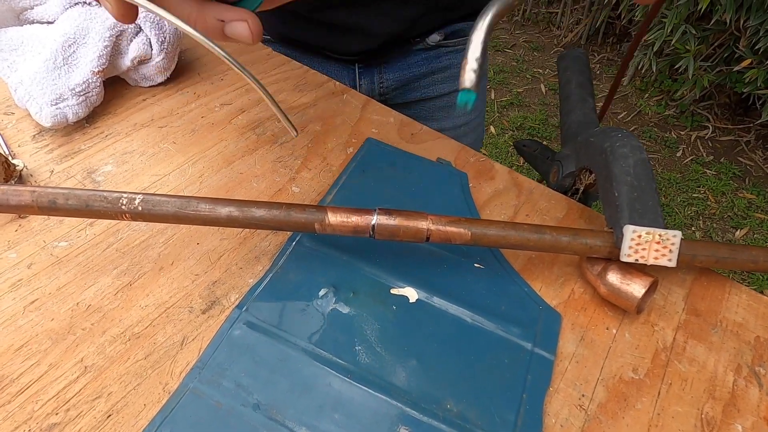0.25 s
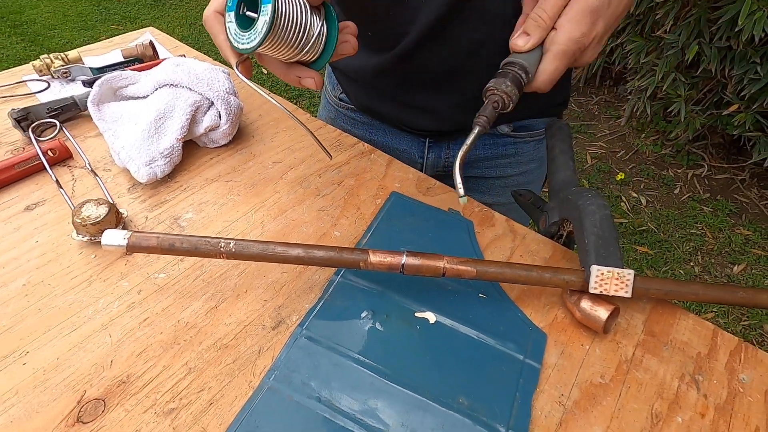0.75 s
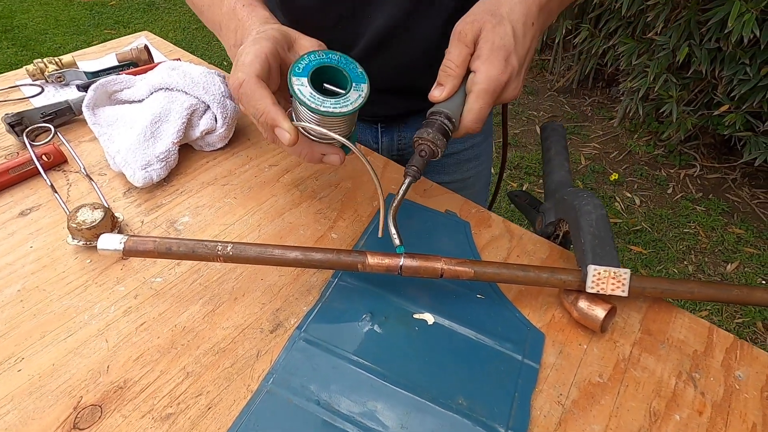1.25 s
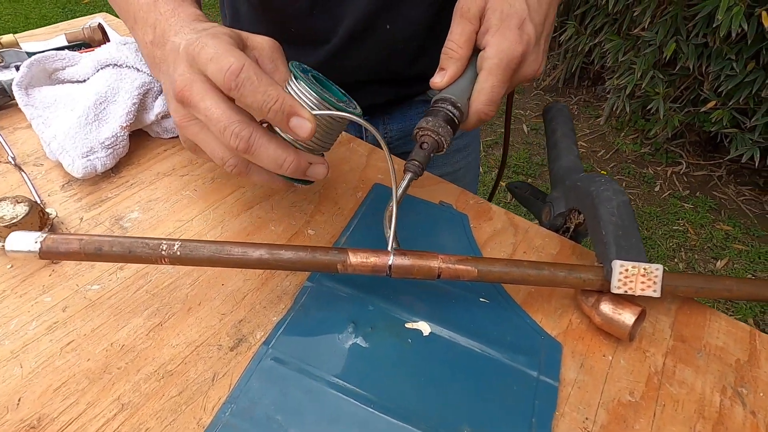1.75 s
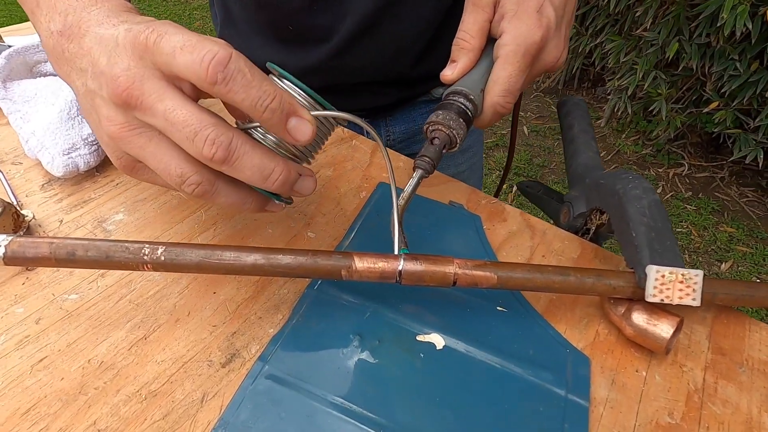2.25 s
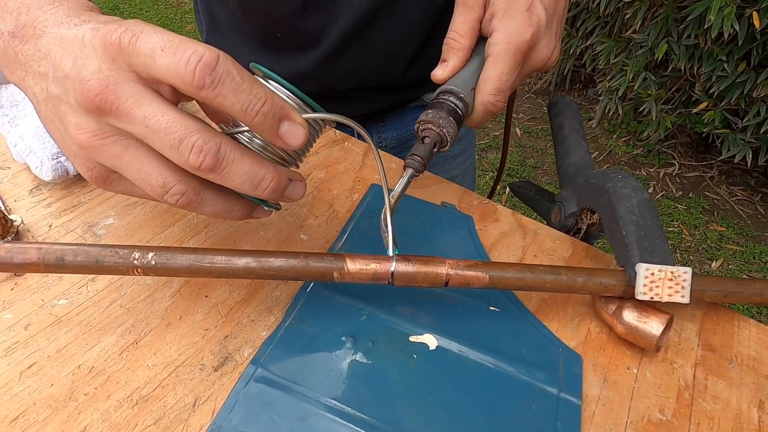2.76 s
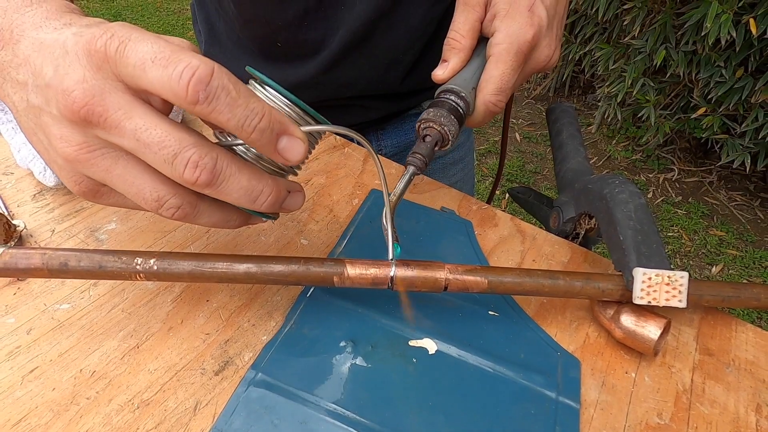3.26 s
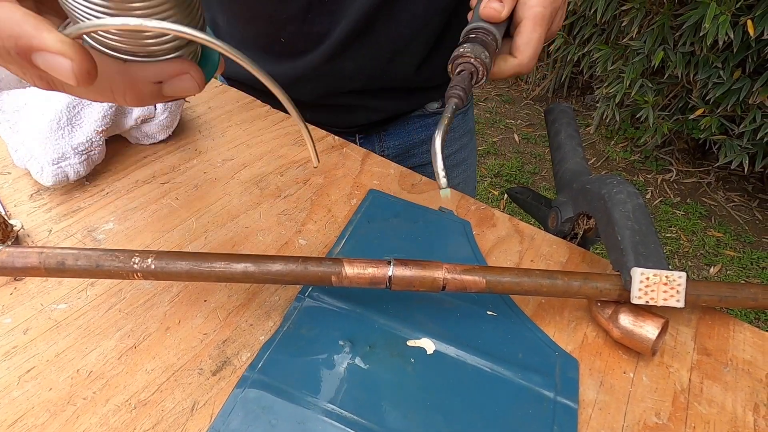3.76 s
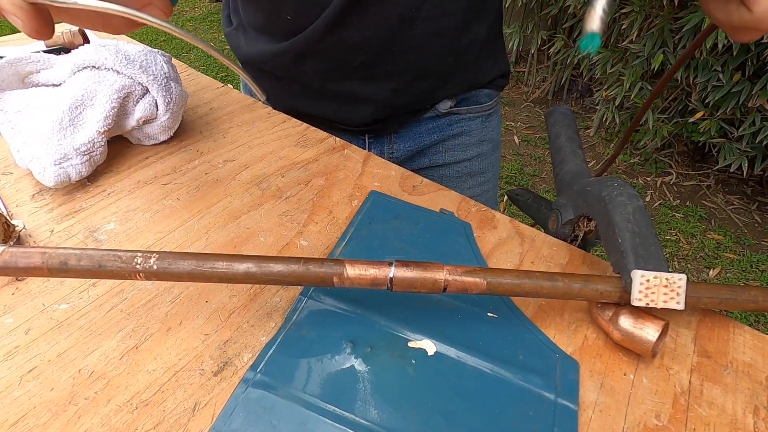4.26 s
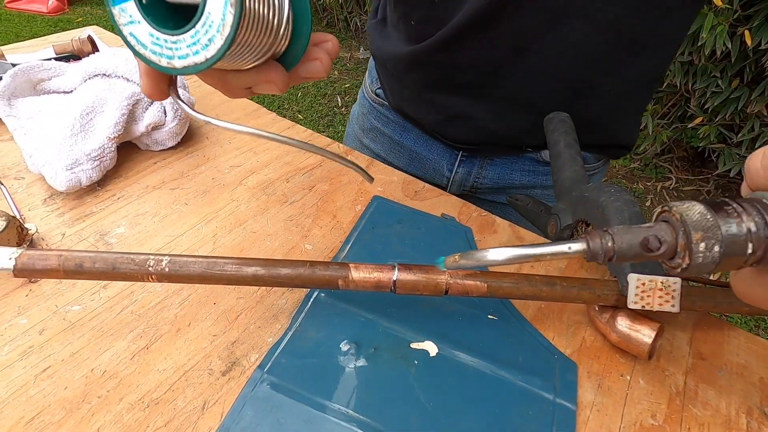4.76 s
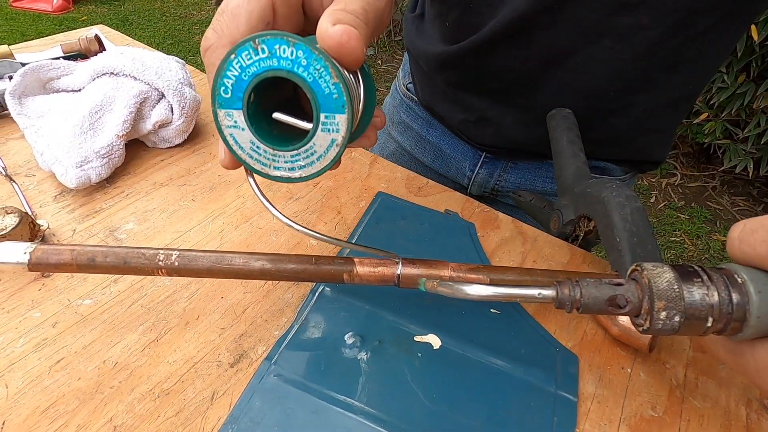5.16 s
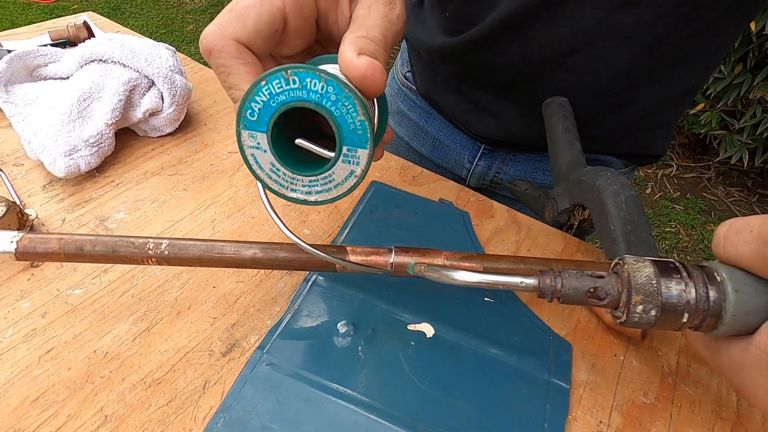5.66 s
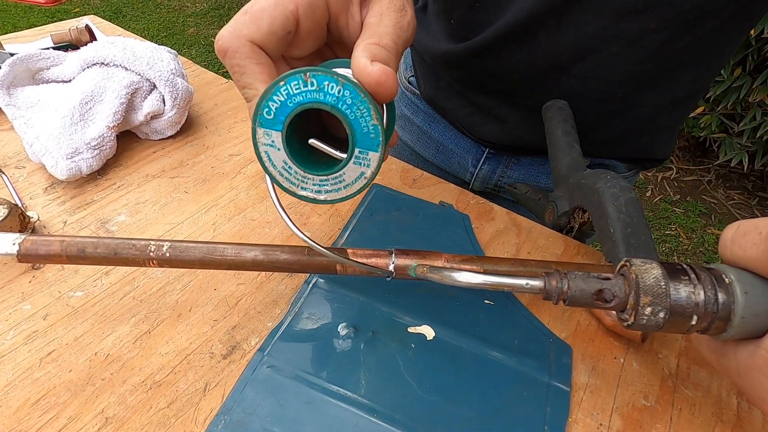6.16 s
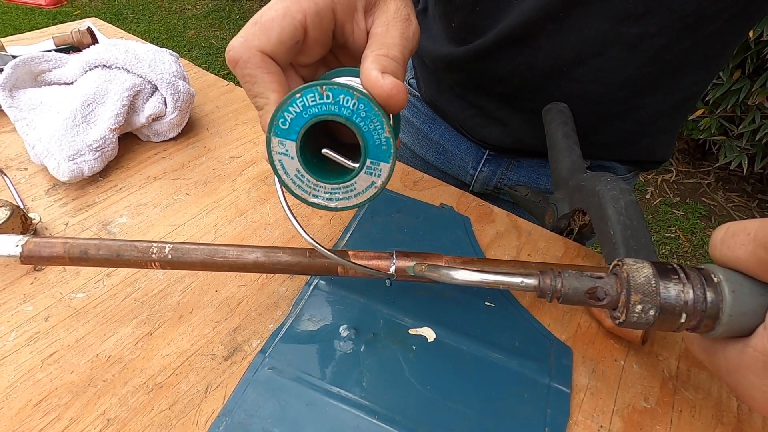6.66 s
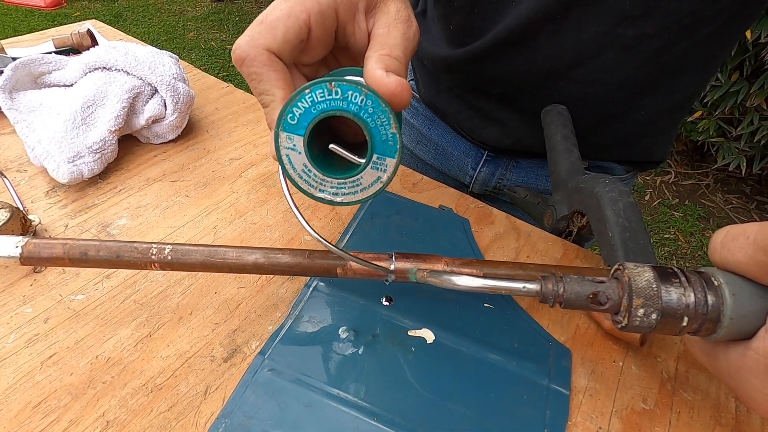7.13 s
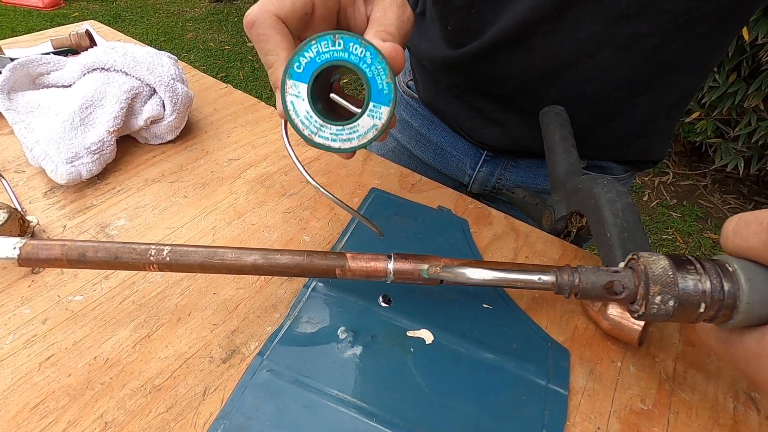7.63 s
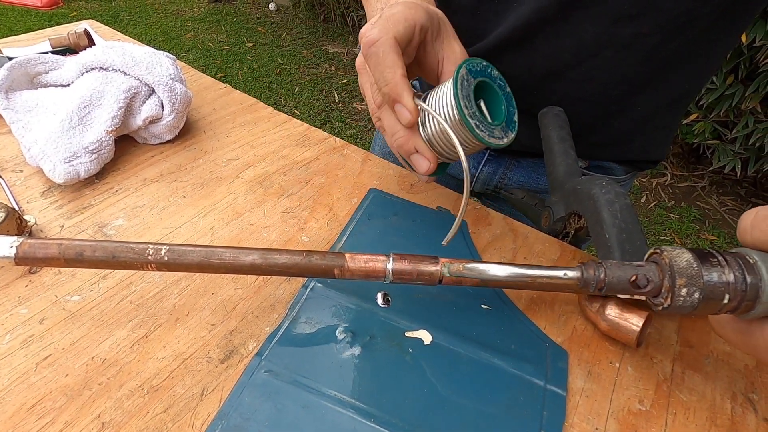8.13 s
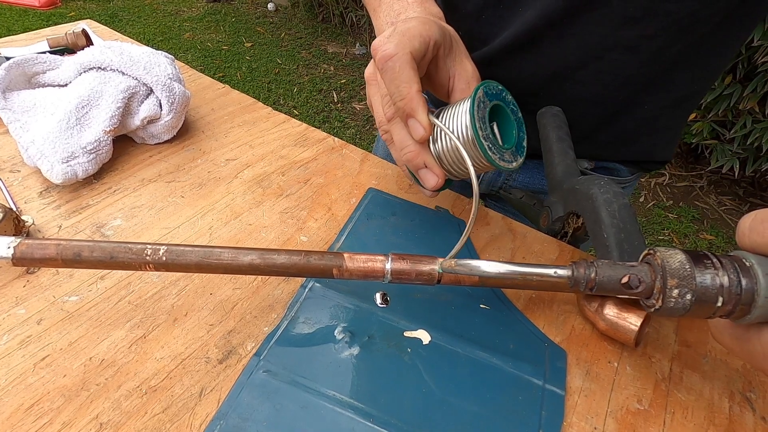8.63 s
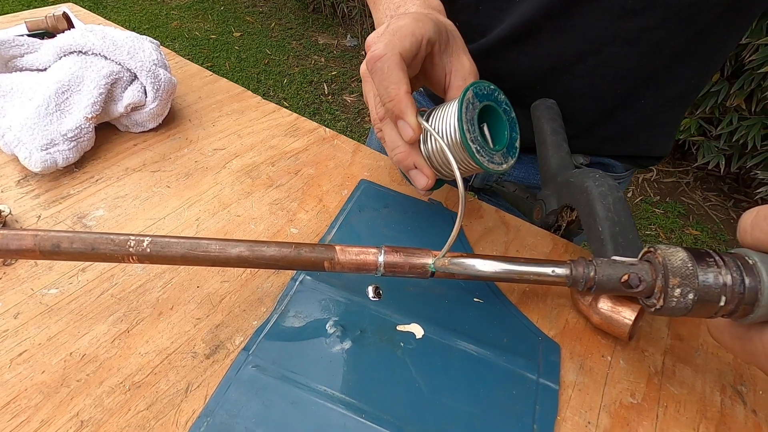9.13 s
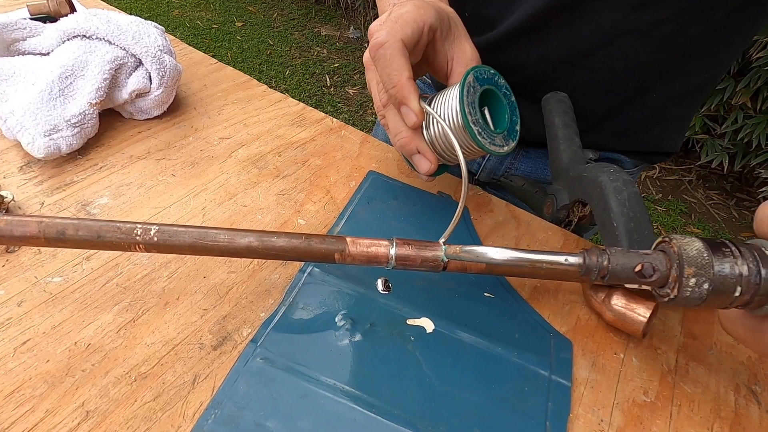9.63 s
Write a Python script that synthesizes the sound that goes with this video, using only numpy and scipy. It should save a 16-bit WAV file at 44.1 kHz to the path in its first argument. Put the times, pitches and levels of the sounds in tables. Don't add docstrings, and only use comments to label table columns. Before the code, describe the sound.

Continuous rushing hiss of a torch flame with a faint nozzle whistle, hollow sweeping shifts, soft wind-like flutters and a fuller roar against pipe.

```python
import sys
import numpy as np
from scipy import signal
from scipy.fft import rfft, irfft, next_fast_len
from scipy.io import wavfile
from scipy.ndimage import uniform_filter1d

SR = 44100
rng = np.random.default_rng(int(sys.argv[2]) if len(sys.argv) > 2 else 0)


def volts_from_db(level):
    exponent = np.asarray(level, float) / 20
    return 10 ** exponent


def to_wav(s):
    ch = np.atleast_2d(s).T
    pcm = np.round(np.clip(ch, -1, 1) * 32767)
    wavfile.write(sys.argv[1], SR, pcm.astype(np.int16))


N = 436149
SIZE = next_fast_len(N + 8192)
HZ = np.maximum(np.arange(SIZE // 2 + 1) * SR / SIZE, 1)
FLICKER_DB = 1.0


def in_time(rows):
    s, *columns = np.transpose(rows)
    return [np.interp(np.arange(N) / SR, s, column) for column in columns]


def spells(rows):
    edge_s = 0.021
    t = np.arange(0, N, 32) / SR
    total = 0
    for middle, length, db in rows:
        rise = np.tanh((t - middle + length / 2) / edge_s)
        fall = np.tanh((t - middle - length / 2) / edge_s)
        total = total + db * (rise - fall) / 2
    return np.interp(np.arange(N) / SR, t, total)


def at_hz(points):
    hz, value = np.transpose(points)
    return np.interp(np.log(HZ), np.log(hz), value)


def filtered(x, gain):
    return irfft(rfft(x, SIZE) * gain, SIZE)[..., :N]


def noise(spectrum, count=1):
    x = filtered(rng.standard_normal((count, N)), volts_from_db(at_hz(spectrum)))
    return x / x.std()


def drift(rate):
    x = filtered(rng.standard_normal(N), 1 / (1 + (HZ / rate) ** 2))
    return x / x.std()


def hiss():
    # (frequency [Hz], density [dB per Hz])
    jet_spectrum = [(200, -24.5), (500, -10), (900, -6.5), (1300, -1.5), (2000, 2), (2600, -1),
                    (3200, -1.5), (3700, -1), (4400, -7), (5200, -7), (6300, -2), (8000, -15),
                    (11000, -33.5), (15000, -48.5)]
    # (time [s], hiss [dB], brightness [dB])
    aim = [(0.0, -41, -14), (.3, -41, -16.5), (0.46, -39, -18), (0.56, -41.5, -29.5), (.75, -43, -17.5),
           (0.9, -42.5, -19), (1.05, -40.5, -19.5), (1.6, -43.5, -11), (2.2, -41.5, -17.5), (2.6, -39, -23),
           (3.0, -39.5, -19), (3.42, -40.5, -18.5), (3.6, -41, -19), (3.8, -39.5, -21.5), (4.0, -40.5, -16),
           (4.3, -40, -19.5), (4.65, -41, -18.5), (5.0, -40, -15.5), (5.4, -41.5, -14.5), (5.75, -44, -9.5),
           (6.5, -41, -18.5), (7.0, -39, -18), (7.4, -42, -14), (7.8, -42, -12.5), (8.3, -43, -11),
           (8.9, -43.5, -10), (9.4, -42, -13), (9.89, -43.5, -11)]
    # (middle [s], length [s], level [dB])
    shades = [(.58, 0.16, -0.5), (1.05, 0.29, -1), (1.64, 0.41, -3.5), (1.98, 0.28, -1.5), (2.56, 0.16, -3),
              (3.5, 0.13, 1), (4.3, 0.28, -3.5), (4.59, 0.075, -4.5), (5.0, 0.083, -1.5),
              (5.55, 0.21, -1.5), (6.65, 0.24, -7), (7.08, 0.12, -3.5), (8.42, 0.13, -3)]
    hiss_db, bright_db = in_time(aim)
    jet = noise(jet_spectrum, count=3)
    bright_hz = 4680
    top = filtered(jet, 1 / (1 + (bright_hz / HZ) ** 4))
    top_gain = volts_from_db(bright_db + spells(shades) + 24.0 + FLICKER_DB * drift(8.0))
    return volts_from_db(hiss_db + 2.5) * (jet - top + top_gain * top)


def roar(wrap_db):
    # (frequency [Hz], density [dB per Hz])
    roar_spectrum = [(150, -21.5), (350, -6), (520, -2), (720, 4), (1000, -5.5), (1500, -12), (2600, -11),
                     (3200, -44)]
    free_flame_db = -54
    return volts_from_db(free_flame_db + wrap_db + FLICKER_DB * drift(24)) * noise(roar_spectrum, count=3)


def rumble():
    # (frequency [Hz], density [dB per Hz])
    low_spectrum = [(15, -35), (30, -36), (55, -0.5), (110, -3.5), (200, 0.5), (320, -4), (600, -35.5)]
    # (middle [s], length [s], level over the calm [dB])
    puffs = [(1.0, 1.8, -1), (.26, 0.2, 8.5), (.53, 0.19, 6), (.75, 0.27, 4), (.98, 0.17, 9.5),
             (1.2, 0.12, 7), (1.95, 0.3, -17), (3.61, 0.12, 6), (3.89, 0.08, 18), (4.05, 0.034, 14),
             (4.45, 0.29, 7.5), (4.68, 0.19, 8), (5.15, 0.44, 7), (5.65, 0.44, 2.5), (6.6, 0.24, 3),
             (7.38, 0.26, 6), (8.4, 0.21, 6)]
    # (middle [s], length [s], level over the calm [dB])
    gusts = [(.27, 0.11, 17.5), (.52, 0.082, 10), (.62, 0.56, 6.5), (.91, 0.061, 6), (1.17, .3, 8),
             (1.64, 0.091, 12), (1.92, 0.24, 12.5), (2.5, 0.051, 4), (2.82, 0.11, 4), (3.6, 0.11, 5),
             (3.89, 0.074, 0), (4.5, 0.21, 11), (4.68, 0.083, 11), (5.28, 0.38, 7.5), (5.7, 0.12, 7),
             (5.87, 0.055, 11), (6.48, .25, 5), (6.92, 0.086, 6), (7.35, 0.18, 5), (7.62, 0.11, 7),
             (7.95, 0.19, 8), (8.3, 0.34, 2), (8.8, .3, 2)]
    calm_db, gust_cut_hz = -66, 133
    x = noise(low_spectrum, count=3)
    deep = filtered(x, 1 / (1 + (HZ / gust_cut_hz) ** 4))
    flutter = volts_from_db(calm_db + spells(puffs) + 2.1 * drift(5.4)) * (x - deep)
    return flutter + volts_from_db(calm_db + spells(gusts)) * deep


def whistle(wrap_db, hz, width_hz, level_db):
    waver_db, choke = 2, 0.71
    x = filtered(rng.standard_normal(N), 1 / (1 + (2 * (HZ - hz) / width_hz) ** 2))
    return volts_from_db(level_db + waver_db * drift(3.7) - choke * wrap_db) * x / x.std()


def whistles(wrap_db):
    # (middle [s], length [s], level [dB])
    turned = [(.75, 0.43, -7), (6.7, 0.8, -13), (1.2, 0.4, -5), (1.6, 0.29, -0.5), (3.7, 0.23, -4),
              (4.0, 0.31, -6), (4.7, 0.79, -6), (8.45, 0.31, 2.5), (9.2, 1.4, 3.5)]
    # (frequency [Hz], width [Hz], level [dB])
    side_whistles = [
        (3930, 127, -62.5),
        (6120, 130, -62),
        (8700, 160, -76),
    ]
    # (middle [s], length [s], level [dB])
    facing = [
        [(.3, .2, 13), (1.3, 1.2, 12), (2.3, 0.23, 1), (3.2, 0.45, 2), (5.8, 0.59, -1), (8.4, 3.7, 11.5)],
        [(.3, .2, 10), (.7, .3, 18), (1.3, 0.65, 11), (2.9, 1.0, 8), (4.28, .25, 13), (5.35, 0.32, 14),
         (6.9, .2, 8)],
        [(.2, .5, 14), (1.75, 1.11, 16.5), (2.5, .2, 14), (3.1, .7, 12.5), (4.1, .2, 12), (4.9, .2, 6),
         (6.9, .9, 6), (8.1, .2, -1)],
    ]
    total = whistle(wrap_db, 5380, 160, -47 + spells(turned))
    for (hz, width_hz, db), rows in zip(side_whistles, facing):
        total = total + whistle(wrap_db, hz, width_hz, db + spells(rows))
    return total


def late(x, delay_ms):
    n = np.arange(N)
    port_skew = 0.015
    left = np.interp(n - delay_ms * (1 + port_skew) * SR / 1000, n, x[0])
    right = np.interp(n - delay_ms * (1 - port_skew) * SR / 1000, n, x[1])
    return np.array([left, right])


def with_echoes(x, source, tables, scale=1):
    paths = [(ms, np.clip(scale * share, 0, 1)) for ms, share in map(in_time, tables)]
    copies = sum(share * late(source, ms) for ms, share in paths)
    power = 1 + sum(share ** 2 for ms, share in paths)
    return (x + copies) / np.sqrt(power)


def worker_echoes(x):
    # (time [s], delay [ms], share [0-1])
    hand = [(0.0, .63, .1), (.9, .63, .15), (1.1, .64, .05), (1.25, .645, .34), (2.1, .63, .26),
            (2.25, .58, .08), (2.4, .525, .22), (3.45, .525, .2), (3.7, .63, .15), (4.9, .635, .14),
            (5.15, .82, .22), (5.5, .82, .22), (5.8, .76, .12), (6.9, .735, .26), (7.5, .74, .1),
            (7.8, .67, .08), (9.89, .67, .1)]
    # (time [s], delay [ms], share [0-1])
    forearm = [(0, 1.13, .12), (1.0, .99, .14), (1.75, 1.1, .06), (2.0, 1.11, .18), (3.1, 1.12, .13),
               (3.5, 1.12, .03), (5.7, 1.2, .06), (6.3, 1.2, .17), (7.2, 1.2, .14), (7.55, 1.2, .04),
               (7.8, 1.11, .2), (9.89, 1.11, .2)]
    # (time [s], delay [ms], share [0-1])
    chest = [(0, 1.8, .06), (1.5, 2.0, .14), (2.2, 2.0, .08), (2.6, 1.83, .14), (3.6, 1.85, .14),
             (4.0, 1.9, .04), (6.7, 2.12, .12), (7.4, 2.1, .04), (7.8, 2.0, .14), (9.89, 2.0, .14)]
    return with_echoes(x, x, [hand, forearm, chest], scale=1.15)


def pipe_echo(x):
    # (time [s], delay [ms], share [0-1])
    pipe = [(0, .07, .05), (1.25, .07, .05), (1.45, .066, .5), (2.0, .068, .5), (2.5, .07, .55),
            (3.0, .068, .5), (3.5, .066, .4), (3.8, .066, .05), (5.0, .055, .05), (5.6, .052, .3),
            (6.3, .055, .2), (7.0, .06, .05), (7.5, .052, .2), (8.0, .055, .05), (8.5, .066, .25),
            (9.0, .06, .05), (9.5, .052, .15), (9.89, .048, .5)]
    return with_echoes(x, x, [pipe])


def bench_echo(x):
    # (time [s], delay [ms], share [0-1])
    at_joint = [(1.33, .097, .6), (1.75, .097, .6), (1.92, .11, .35), (2.1, .14, .5), (2.3, .152, .65),
                (2.48, .16, .8), (2.62, .16, .97), (2.9, .154, .97), (3.25, .151, .95), (3.46, .156, .9),
                (5.3, .165, .95), (5.48, .158, .85), (5.65, .16, .5), (6.0, .158, .7), (6.35, .155, .55),
                (6.7, .148, .88), (7.1, .149, .85), (7.45, .155, .65), (7.75, .165, .87), (8.2, .161, .88),
                (8.65, .166, .95), (8.95, .161, .86), (9.3, .166, .99), (9.55, .165, .99),
                (9.89, .156, .93)]
    # (time [s], delay [ms], share [0-1])
    lifts = [(0.0, .172, .6), (.12, .19, .5), (.22, .265, .55), (.33, .33, .55), (.41, .52, .65),
             (.48, .57, .7), (.55, .38, .55), (.62, .26, .8), (.72, .25, .97), (.8, .235, .95),
             (.86, .195, .9), (.92, .15, .9), (.97, .125, .6), (1.04, .106, .75), (1.24, .116, .7),
             (3.54, .19, .7), (3.63, .27, .55), (3.76, .31, .7), (3.84, .23, .6), (3.91, .178, .3),
                   (3.98, .23, .55), (4.08, .32, .75), (4.18, .46, .7), (4.3, .59, .62), (4.45, .55, .45),
                   (4.58, .42, .42), (4.68, .32, .6), (4.78, .25, .7), (4.86, .2, .85), (4.95, .182, .9),
                   (5.1, .174, .93)]
    bench = sorted(at_joint + lifts)
    ms, share = in_time(bench)
    rebound = np.clip(0.45 * share ** 2, 0, .6)
    once = x
    for _ in range(5):
        x = once - rebound * late(x, ms)
    echo_cut_hz = 38000
    dull = filtered(x, 1 / np.sqrt(1 + (HZ / echo_cut_hz) ** 4))
    return with_echoes(x, dull, [bench])


def scene():
    # (middle [s], length [s], level over the free flame [dB])
    wraps = [(.3, 0.68, 0), (1.5, 1.4, 2), (4.3, 0.62, -2.5), (5.12, 0.1, 7), (5.6, 0.19, 5),
             (5.85, 0.22, 2), (6.52, 0.64, 5), (6.9, 1.5, 5), (7.2, 0.54, 4.5), (8.41, 0.17, 9.5)]
    # (frequency [Hz], level [dB])
    scatter = [(30, -5), (120, -10), (500, -18), (1500, -19), (3200, -22), (4500, -12), (8000, -8.5),
               (12000, -1)]
    wrap_db = spells(wraps)
    flame = hiss() + roar(wrap_db)
    low = rumble()
    both_ports = np.array([flame[0], flame[0]])
    echoed = bench_echo(pipe_echo(worker_echoes(both_ports)))
    direct = echoed + whistles(wrap_db) + low[0]
    return direct + filtered(flame[1:] + low[1:], volts_from_db(at_hz(scatter)))


def cavities(rows):
    return volts_from_db(sum(db / (1 + (2 * (HZ - hz) / width) ** 2) for hz, width, db in rows))


def microphone_ports(dry):
    # (frequency [Hz], width [Hz], level [dB])
    housing = [(1520, 156, 4.5), (1722, 167, -10.5), (2160, 300, 0), (3970, 92, 3), (4480, 210, 2.5),
               (382, 138, -6), (5700, 300, -2.5), (6450, 800, -12), (7960, 48, -11), (9300, 85, -9)]
    # (frequency [Hz], width [Hz], level [dB])
    left_port = [(880, 180, -3), (1180, 160, -2.5), (7450, 750, -15), (12000, 1700, -10)]
    # (frequency [Hz], level [dB])
    port_balance = [(60, 2.5), (400, -1), (1500, 0), (3000, 1), (5900, 3), (6500, 2.5), (8800, -1),
                    (10000, -4), (12000, -7.5), (14500, -3)]
    # (frequency [Hz], phase [radians])
    port_phase = [(0, 0), (200, -.25), (5400, -1.75), (5950, -2.3), (6300, -3), (7330, -3.6), (7550, -1.2),
                  (8600, -1), (9100, -2.1), (11200, -3.2), (11700, -3.9), (12100, -.9), (13500, -2.9),
                  (15500, -3.1)]
    lead = np.interp(HZ, *np.transpose(port_phase))
    half = volts_from_db(at_hz(port_balance) / 2) * np.exp(.5j * lead)
    ports = np.array([half * cavities(left_port), 1 / half])
    return filtered(dry, cavities(housing) * ports)


def cancelling(mid):
    hz, width_hz, depth_db = 6570, 900, -4
    return filtered(mid, volts_from_db(depth_db / (1 + (2 * (HZ - hz) / width_hz) ** 8)))


def smeared(x):
    return uniform_filter1d(uniform_filter1d(x, size=5, axis=2), size=2, axis=1)


def dropouts(x):
    # (frequency [Hz], share of time in sum [0-1], in difference [0-1])
    dropped = [(4500, 0, 0), (5000, .05, 0), (5400, .01, 0), (5860, .06, 0), (6030, .1, 0), (6210, .35, 0),
               (6370, 1, 0), (6800, 1, 0), (6880, .03, 0), (7400, .04, 0), (7800, 0, 0), (8600, .02, .02),
               (9400, .2, .12), (10800, .24, .17), (12000, .12, .15), (13300, .15, .2), (14100, .28, .3),
               (14800, .75, .75), (15200, .98, .98), (15700, 1, 1)]
    # (middle [s], length [s], low edge [Hz], high edge [Hz])
    holes = [(3.05, 1.1, 6300, 6900), (7.4, 3.8, 6300, 6900), (6.2, 1.1, 6150, 6900),
             (7.9, 1.6, 6150, 6900), (2.66, .12, 5850, 6900), (2.87, .12, 5850, 6900),
             (3.07, .12, 5850, 6900), (3.53, .14, 5850, 6900), (5.59, .06, 5850, 6900),
             (6.6, .1, 5850, 6900), (6.8, .12, 5850, 6900), (7.14, .08, 5850, 6900),
             (1.68, .14, 6900, 7500), (1.9, .04, 6900, 7500), (1.6, .05, 10700, 11700),
             (2.19, .08, 10500, 11900), (2.8, .07, 9000, 9700), (3.53, .1, 10500, 11400),
             (4.1, .14, 9800, 11000), (4.55, .25, 9000, 9700), (5.52, .18, 9000, 9700),
             (5.7, .12, 9700, 11000), (7.6, .12, 9100, 9800), (7.65, .07, 10500, 11400),
             (8.13, .1, 9100, 9800), (8.58, .1, 10300, 11000), (9.58, .06, 9800, 11000),
             (9.79, .09, 9100, 11000), (9.86, .06, 10000, 11000)]
    # (middle [s], length [s])
    returns = [(.48, .06), (1.99, .06), (2.55, .08), (2.78, .04), (3.18, .07), (3.4, .07), (1.18, .04),
               (4.05, .06), (4.33, .05), (5.15, .03), (4.77, .05), (5.85, .05), (6.7, .05), (7.05, .05),
               (7.75, .05), (8.81, .06), (8.94, .04)]
    hz, t, cells = signal.stft(x, SR, nperseg=1024)
    bands = abs(cells[:, :512].reshape(2, 128, 4, -1)) ** 2
    power = smeared(bands.mean(axis=2))
    hz = hz[:512:4]
    strong = power[:, (hz > 6900) & (hz < 8600)].mean(axis=(0, 1))
    whim = smeared(rng.standard_normal(power.shape))
    margin_db = 10 * np.log10(power / strong + 1e-12) + 14 * whim
    rank = margin_db.argsort(axis=2).argsort(axis=2) / power.shape[2]
    at, *shares = np.transpose(dropped)
    kept = rank >= np.array([np.interp(hz, at, share) for share in shares])[..., None]
    for middle, length, low, high in holes:
        lost_bands = (hz > low - 150) & (hz < high - 80)
        lost_times = abs(t - middle) < length / 2 + .01
        kept[0][np.ix_(lost_bands, lost_times)] = False
    for middle, length in returns:
        kept[0][np.ix_(hz < 6900, abs(t - middle) < length / 2)] = True
    cells[:, :512] *= np.repeat(kept, 4, axis=1)
    return signal.istft(cells, SR, nperseg=1024)[1][:, :N]


def top_cut(x):
    return signal.sosfilt(signal.butter(12, 15610, fs=SR, output="sos"), x)


def record(dry):
    left, right = microphone_ports(dry)
    mid = cancelling((left + right) / 2)
    side = (left - right) / 2
    mid, side = dropouts(np.array([mid, side]))
    return top_cut(np.array([mid + side, mid - side]))


dry = scene()
out = record(dry)
to_wav(out)
```